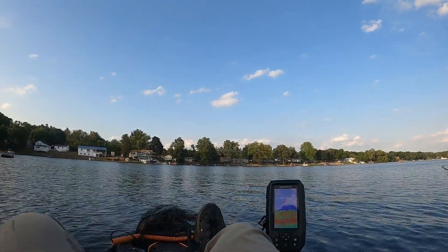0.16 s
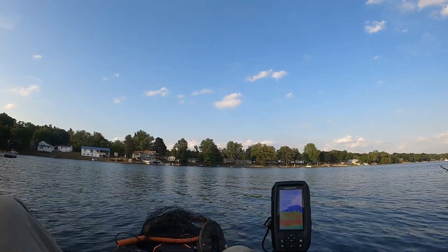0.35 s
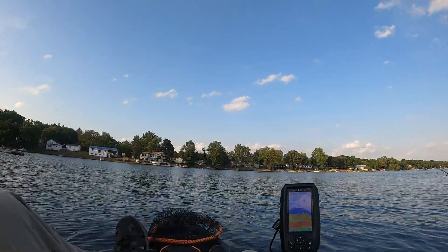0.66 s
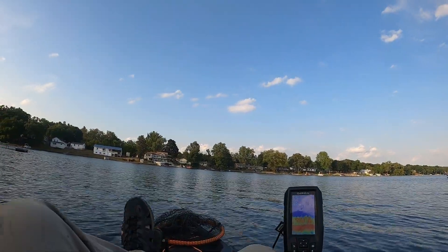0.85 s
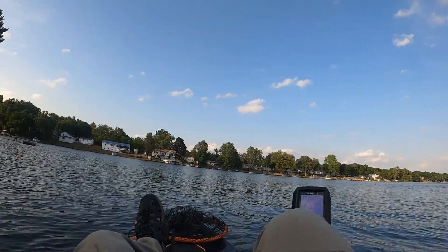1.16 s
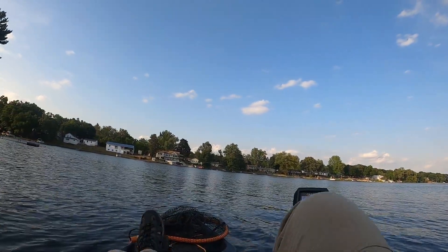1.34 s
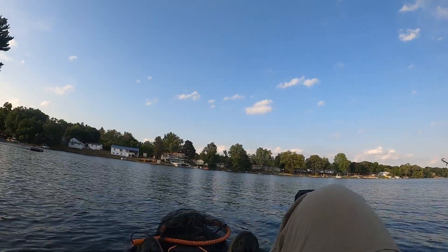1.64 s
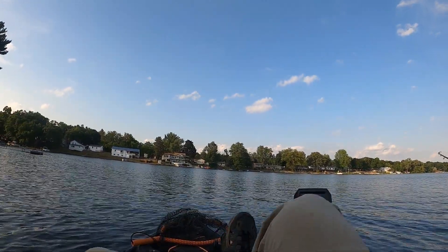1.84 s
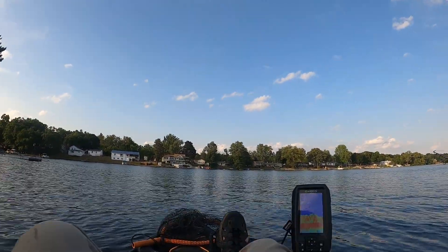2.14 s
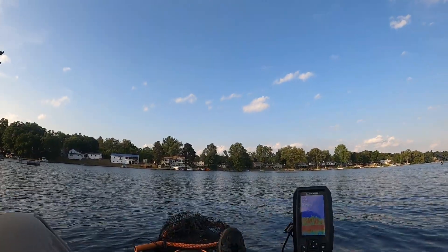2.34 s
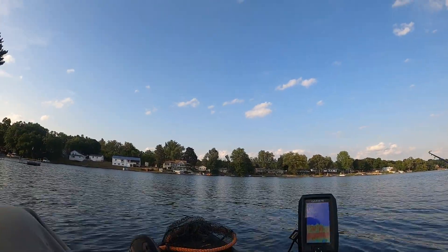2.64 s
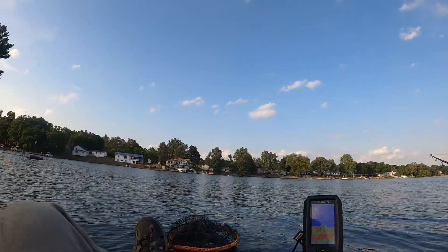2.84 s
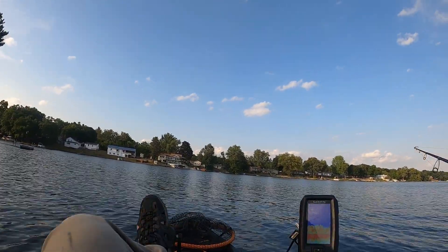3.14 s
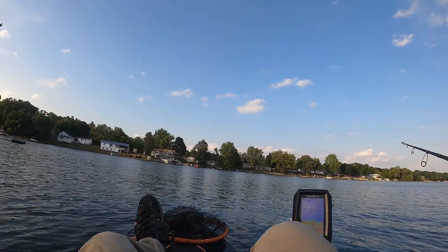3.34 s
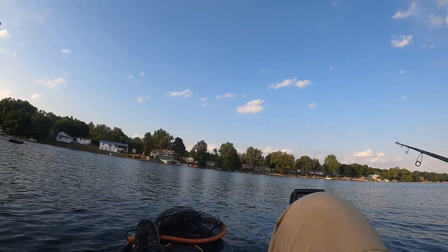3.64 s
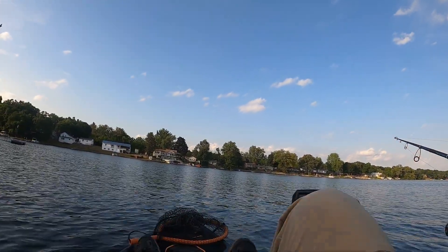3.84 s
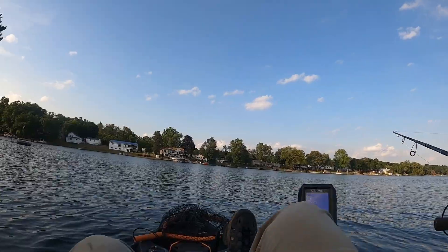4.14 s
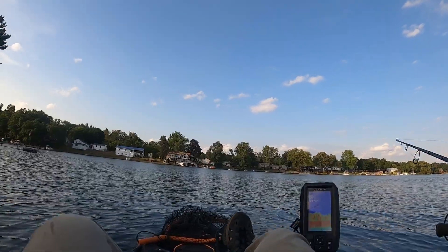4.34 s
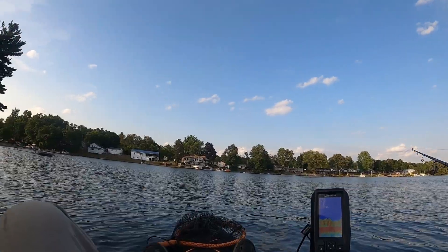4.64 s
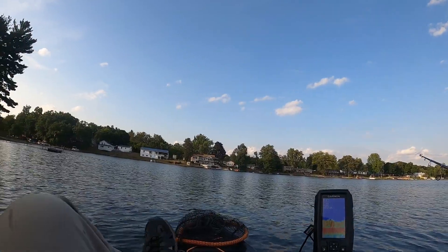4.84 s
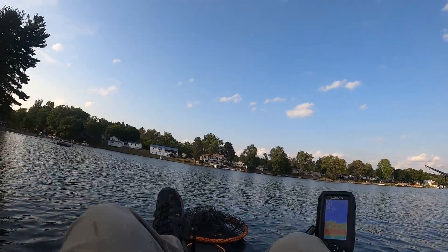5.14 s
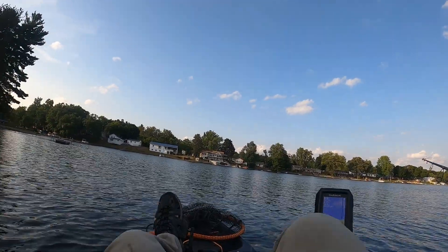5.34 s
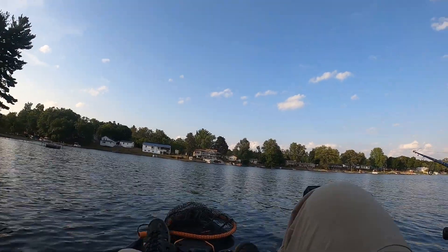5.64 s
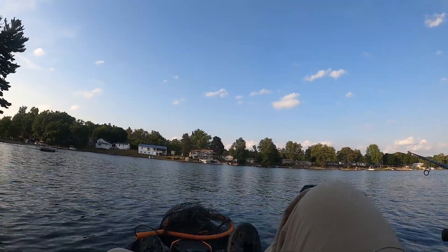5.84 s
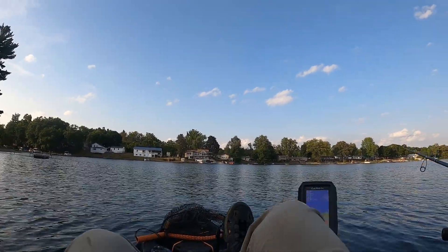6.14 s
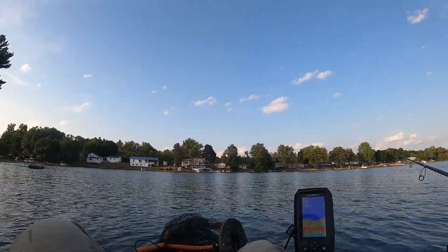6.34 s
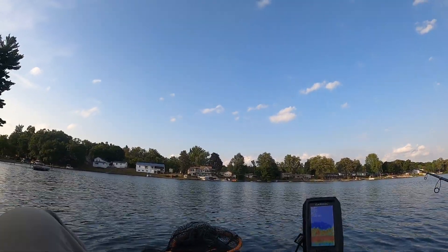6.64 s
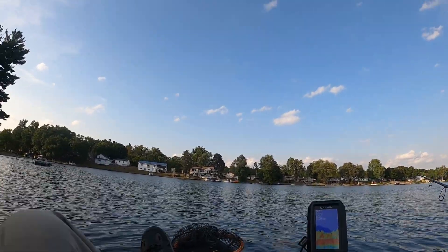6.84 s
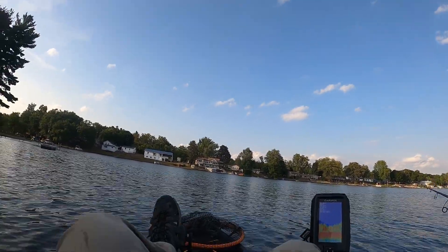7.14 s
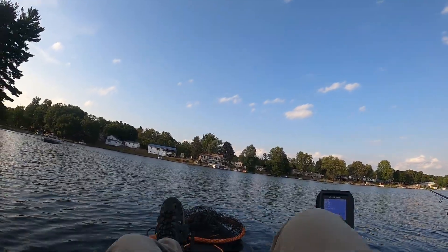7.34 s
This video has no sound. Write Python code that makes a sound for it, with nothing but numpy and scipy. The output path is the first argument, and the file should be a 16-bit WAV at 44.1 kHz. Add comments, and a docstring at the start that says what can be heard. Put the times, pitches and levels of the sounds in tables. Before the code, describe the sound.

Pedalling pushes a plastic kayak across a lake: broad watery wash rises and drops, then short laps and round plops follow. Light taps on the hull come singly at first, then a strong double knock with a boom, later a busy rattle with a splashy thump, and finally a soft bump and a sharper click. An unsteady low hum and rumble stay underneath. Heard very near, in stereo, without echo.

```python
"""Water washes along the plastic hull of a pedal kayak with each push of the legs on a calm lake.
Heard on board, close to the hull, through the two microphone ports of a small camera.
The water is patchy coloured noise; bubbles are gliding sines; knocks and thumps ring hull modes.
Splashes are noise puffs, and a low hum wavers over hull drumming, deep rumble and a faint hiss."""
import sys
import numpy as np
from scipy import signal
from scipy.fft import rfft, irfft
from scipy.io import wavfile
from scipy.ndimage import uniform_filter1d

SR = 44100
rng = np.random.default_rng(int(sys.argv[2]) if len(sys.argv) > 2 else 0)


def put_to_file(sound):
    """Save the sound as 16-bit audio at rate SR, in the file named by the first command-line argument."""
    columns = np.atleast_2d(sound).T  # one column per channel
    safe = np.clip(columns, -1, 1)
    whole_steps = np.round(safe * 32767)
    wavfile.write(sys.argv[1], SR, whole_steps.astype(np.int16))


N = 329896


def from_db(db):
    """Decibels to gain."""
    return 10 ** (np.asarray(db) / 20)


def rms_one(x):
    """Scale to unit rms."""
    return x / np.sqrt(np.mean(x ** 2) + 1e-20)


def in_time(rows):
    """Level from a table of t/s and level/dB, one value a sample."""
    s, level_db = np.transpose(rows)
    return np.interp(np.arange(N) / SR, s, level_db)


def at_hz(points, hz):
    """Columns of a table by frequency, read on a log axis."""
    f, *columns = np.transpose(points)
    return [np.interp(np.log(np.maximum(hz, 1)), np.log(f), c) for c in columns]


def drift(rate_hz):
    """Slow chance of spread 1: noise at every 40th sample through a double one-pole."""
    r = np.exp(-2 * np.pi * rate_hz * 40 / SR)
    noise = rng.standard_normal(N // 40 + 2002)
    slow = signal.lfilter([1], [1, -2 * r, r * r], noise)[2000:]   # the filter has settled
    return np.interp(np.arange(N) / 40, np.arange(len(slow)), rms_one(slow))


def ring(clicks, hz, t60):
    """A damped mode: a unit click sets a sine ringing, its t60 never under 2 ms."""
    r = from_db(-60 / (max(t60, .002) * SR))
    w = 2 * np.pi * hz / SR
    return signal.lfilter([0, np.sin(w)], [1, -2 * r * np.cos(w), r * r], clicks + 1e-18)


def water_noise(spectrum, patchy_db, rate_hz):
    """Two unrelated draws of coloured noise, each half-octave band flickering partly on its own; rms 1."""
    hz = np.fft.rfftfreq(N, 1 / SR)
    lowest, highest = spectrum[0][0] / 2, spectrum[-1][0] * 2   # an octave past the table
    coloured = rfft(rng.standard_normal((2, N))) * from_db(at_hz(spectrum, hz)[0])
    coloured = coloured * (hz > lowest) * (hz < highest)
    place = 2 * np.log2(hz + 1)   # in half octaves
    together = drift(rate_hz)
    out = 0
    for k in range(int(2 * np.log2(lowest)), int(2 * np.log2(highest)) + 2):
        weight = np.sqrt(np.clip(1 - np.abs(place - k), 0, 1))
        band = irfft(coloured * weight, N)
        out = out + band * from_db(patchy_db * (0.14 * together + drift(rate_hz)))
    return rms_one(out)


def add(track, s, sound):
    """Mix a sound into a track at a time."""
    i = round(s * SR)
    track[..., i:i + sound.shape[-1]] += sound[..., :N - i]


# swells, one for each push of the legs and a small one between:
# crest t/s, rise t/s, hold t/s, wash level/dB at the crest, lapping level/dB as the push ends
LEG_PUSHES = [(0.297, 0.62, 0.28, -55.5, -60.5), (1.19, 0.2, 0.31, -53, -67), (1.773, 0.14, 0.02, -59, -62),
              (2.19, 0.3, 0.4, -55.5, -69), (3.377, 0.45, 0.29, -52.5, -63.5),
              (4.393, 0.25, 0.33, -55, -62.5), (5.376, 0.5, 0.45, -53.5, -58.5),
              (6.529, 0.58, 0.071, -51.5, -59), (7.27, 0.3, 0.24, -53, -62)]
SLACK_DB, SAG_DB_PER_S, FALL_DB_PER_S = -66, 12, 62   # wash between pushes; decline held, extra once let go
LAP_SLACK_DB, LAP_RISE_DB_PER_S, LAP_FALL_DB_PER_S = -67.5, 14, 39


def pushes():
    """Wash dB rises to each crest, sags and drops; lapping dB peaks as each push ends."""
    crest, rise, hold, wash_db, lap_db = np.transpose(LEG_PUSHES)[..., None]
    after = np.arange(N) / SR - crest
    rising = wash_db + (wash_db - SLACK_DB) * after / rise
    falling = wash_db - SAG_DB_PER_S * after - FALL_DB_PER_S * np.maximum(after - hold, 0)
    wash = np.maximum(np.minimum(rising, falling).max(axis=0), SLACK_DB)
    released = after - hold
    lap = lap_db + np.minimum(LAP_RISE_DB_PER_S * released, -LAP_FALL_DB_PER_S * released)
    return uniform_filter1d(wash, size=SR // 10), np.maximum(lap.max(axis=0), LAP_SLACK_DB)


# colour of the water along the hull: f/Hz, relative level/dB per Hz
WASH_COLOUR = [(400, -0.5), (650, -4.5), (1100, -4), (1700, -5.5), (2600, -7), (4000, -12.5), (6300, -17),
               (7500, -25), (9000, -23.5), (10500, -32), (12500, -29), (14500, -50)]


def wash(wash_db):
    """Broad turbulence noise along the hull, swelling with the pushes."""
    return from_db(wash_db + 0.44 * drift(90.0)) * water_noise(WASH_COLOUR, patchy_db=1.48, rate_hz=22.0)


# colour of the lapping: f/Hz, relative level/dB per Hz
LAP_COLOUR = [(250, 0), (450, -6), (650, -4.5), (1050, 1.5), (1600, -14.5), (2500, -38), (4000, -59)]


def lapping(lap_db):
    """Darker water noise in short uneven spurts, strongest as a push ends."""
    spurts_db = 1.5 * drift(56)
    return from_db(lap_db + spurts_db) * water_noise(LAP_COLOUR, patchy_db=3.5, rate_hz=20)


def bubble(hz, length, rise):
    """A pocket of air rings near the surface, its pitch gliding by the signed rise, its swell uneven."""
    length = max(length, .003)
    t = np.arange(int(2 * length * SR)) / SR / length   # in lengths
    wobble_oct = .05 * np.interp(t, np.linspace(0, 2, 9), rng.standard_normal(9))
    glide_oct = rise * (np.minimum(t, 1.3) ** 0.98 - .4)
    pitch = hz * 2 ** (glide_oct + wobble_oct)
    uneven = 1 + 0.5 * np.interp(t, np.linspace(0, 2, 12), rng.standard_normal(12))
    swell = np.minimum(t / 0.11, 1) * np.exp(-t ** 3 * 0.52) * uneven
    return swell * np.sin(2 * np.pi * np.cumsum(pitch) / SR)


# single bubbles close by, and at 7.283 s a short 2.23 kHz ring after the knock just before it: t/s, level/dB
# before the uneven swell, nominal f/Hz, length/s (3 ms at least), glide/octaves per length
PLOPS = [(0.251, -47.5, 1610, 0.012, 0.0011), (0.43, -49, 1230, 0.0034, 0.22),
         (0.484, -52, 1350, 0.011, -.05), (0.507, -45.5, 810, 0.007, -0.14),
         (0.548, -63, 2800, 0.0046, -0.045), (0.602, -57, 1920, 0.013, -0.053),
         (0.636, -49, 1190, 0.0044, 0.18), (0.647, -44, 777, 0.023, 0.028), (0.702, -45, 1230, 0.015, 0.25),
         (0.856, -53, 1650, .005, 0.1), (0.897, -64, 2130, .005, 0.13), (1.268, -43.5, 535, .012, -0.066),
         (1.31, -51, 1840, 0.0067, .02), (1.701, -40, 1080, 0.0061, 0.1),
         (1.733, -41.5, 970, 0.0035, 0.048), (1.794, -50, 1920, 0.004, 0.05),
         (1.799, -51, 1950, 0.0046, 0.3), (1.822, -54, 2000, .004, 0.091), (2.043, -40, 1164, 0.012, 0.35),
         (2.159, -49, 1280, 0.0087, 0.031), (2.671, -49, 1150, 0.019, 0.086),
         (2.966, -54, 806, 0.022, 0.065), (3.127, -39, 1075, 0.004, 0.093),
         (3.382, -41, 2970, 0.0027, -0.064), (3.557, -34.5, 1040, 0.012, 0.13),
         (4.193, -45.5, 824, 0.02, -0.05), (4.214, -48, 980, 0.015, 0.14), (4.324, -42.5, 876, 0.035, 0.61),
         (4.654, -42, 1020, 0.0031, 0.0068), (4.658, -43.5, 1067, 0.02, 0.012),
         (4.69, -42.5, 970, 0.0059, -0.35), (4.694, -45.5, 2600, 0.0037, 0.0067),
         (4.748, -47, 2050, 0.0061, -0.3), (4.768, -47, 1050, 0.0058, 0.0042),
         (4.975, -46, 926, 0.019, 0.65), (5.131, -53, 2370, .008, 0.18), (5.223, -42.5, 1076, 0.011, -0.13),
         (5.3343, -34.5, 2420, 0.0025, -0.41), (5.81, -55, 1550, .008, .05),
         (5.848, -49, 1290, 0.0091, 0.062), (5.895, -45, 1040, 0.011, 0.31),
         (5.945, -51.5, 2140, .005, 0.1), (6.205, -45, 1800, 0.0078, -0.1),
         (6.211, -47, 1204, 0.017, -0.042), (6.247, -50, 1850, 0.0058, -0.4),
         (6.256, -49, 1880, 0.0073, -0.05), (6.304, -45, 1050, 0.008, -0.21),
         (6.589, -50, 1020, 0.013, 0.15), (6.781, -50, 1090, 0.0064, 0.087), (6.96, -57, 3020, 0.0056, 0.1),
         (7.109, -41.5, 974, 0.013, 0.17), (7.131, -47, 1130, .016, -0.069),
         (7.193, -39.5, 1100, 0.0071, -0.15), (7.283, -45, 2230, 0.009, -0.044),
         (7.343, -51, 3440, 0.0037, -0.27)]


def bubbles():
    """The clear plops at the waterline, and one short ring after a knock, each a gliding sine."""
    out = np.zeros(N)
    for s, db, hz, length, rise in PLOPS:
        add(out, s, from_db(db) * bubble(hz, length, rise))
    return out


def gurgle(per_s):
    """Many small bubbles at random, mostly near one kilohertz; rms 1."""
    out = np.zeros(N)
    for when, size, tone, cycles in rng.random((int(per_s * N / SR), 4)):
        hz = 1050 * 2 ** (6.0 * (tone - .42) ** 3 + .6 * (tone - .42))
        off_pitch_db = -5 * abs(np.log2(hz / 1050))   # fainter either side of the centre
        level_db = -2.5 * np.log(size + 0.0091) + off_pitch_db
        length = (2 + 6 * cycles ** 3) / hz
        add(out, when * N / SR, from_db(level_db) * bubble(hz, length, 0.18))
    return rms_one(out)


# soft splashes against the side: t/s, rms level/dB before the envelope, centre f/Hz, length/s
SIDE_SPLASHES = [(3.133, -52, 2400, 0.079), (3.234, -53, 2100, 0.076), (3.397, -49.5, 900, 0.025),
                 (3.92, -34.5, 503, 0.032), (4.651, -56, 1520, 0.063), (4.888, -56.5, 1380, 0.13),
                 (5.738, -29, 560, 0.02), (6.266, -56.5, 1150, 0.11)]


def splashes():
    """Puffs of noise in a broad band, quick to rise and slower to fade."""
    out = np.zeros((2, N))
    for s, db, hz, length in SIDE_SPLASHES:
        t = np.arange(int(.2 * SR)) / SR / length   # in lengths
        band = signal.butter(2, [hz / 2.15, hz * 1.13], "band", fs=SR, output="sos")
        puff = rms_one(signal.sosfilt(band, rng.standard_normal((2, len(t)))))
        add(out, s, from_db(db) * puff * np.minimum(t / 0.11, 1) * np.exp(-t ** 2))
    return out


def faint_ticks(lap_db, count):
    """Rows like the knocks, at random moments and of random colour, louder while the water laps."""
    draw = rng.random((count, 4))
    at = (draw[:, :1] * (N - 400)).astype(int)
    over_lap_db = np.array([6, 3, 2])   # low, middle, high modes
    spread_db = 5 * (draw[:, 1:] - .5) * 2
    return np.hstack([at / SR, lap_db[at] + over_lap_db + spread_db])


# gear knocks and ticks on the hull: t/s, drive level/dB of the low, middle and high small-panel modes
HULL_KNOCKS = [(0.563, -44.5, -65, -66), (0.647, -59, -66, -70), (1.236, -71, -58, -51),
               (1.262, -51, -49, -56), (1.286, -64, -46, -44), (1.355, -42, -45.5, -46),
               (1.417, -65, -50, -52), (1.774, -41.5, -64, -68), (2.316, -44.5, -50, -54),
               (2.421, -44, -51, -63), (3.2973, -33.5, -25, -46), (3.3004, -26, -24.5, -38),
               (3.525, -45, -44, -44), (3.536, -36, -49.5, -39), (3.921, -47, -45, -44),
               (3.93, -40.5, -45, -48), (4.604, -44.5, -51, -66), (4.672, -43, -43.5, -39),
               (4.701, -53, -55, -52), (4.728, -42, -47, -43), (4.88, -49, -57, -71),
               (5.211, -60, -54, -51), (5.3375, -36, -44, -58), (5.416, -44, -65, -71),
               (5.565, -49, -53, -66), (5.614, -41, -50, -49), (5.666, -51, -66, -58),
               (5.696, -44, -48, -42), (5.715, -41, -65, -64), (5.734, -32, -41, -60),
               (5.744, -30.5, -37, -51), (5.769, -39, -43, -63), (5.835, -40.5, -56, -64),
               (5.866, -47, -54, -46.5), (5.888, -44, -53, -51), (5.918, -65, -62, -51.5),
               (5.973, -42.5, -66, -66), (6.32, -43, -70, -64), (6.343, -45.5, -63, -64),
               (7.278, -40.5, -32.5, -40), (7.32, -66, -46.5, -28)]
# small panels that crack: f/Hz, relative level/dB, t60/s (2 ms at least)
SMALL_PANELS = [(481, 5.5, 0.011), (545, -3.5, 0.064), (778, -2, 0.027), (982, 0.5, 0.022),
                (1078, -4, 0.041), (1394, 0.5, 0.02), (2050, 6, 0.011), (2350, -1, 0.016),
                (2800, -5, 0.007), (3430, 0, 0.0042), (4250, -2.5, 0.0015), (5420, -9, 0.002),
                (6700, -23, 0.002), (9700, -28, 0.0018)]


def knocks(lap_db):
    """Each contact rattles for a few milliseconds and rings the small panels' modes."""
    s, low_db, mid_db, high_db = np.vstack([HULL_KNOCKS, faint_ticks(lap_db, count=110)]).T
    at = np.round(s * SR).astype(int)
    t = np.arange(400) / SR
    out = np.zeros(N)
    for hz, db, t60 in SMALL_PANELS:
        level_db = low_db if hz < 1600 else mid_db if hz < 3000 else high_db
        # high modes catch only the first sharp touch
        touch = np.minimum(t / .0004, 1) * np.exp(-t / 0.002 * np.sqrt(hz / 1000))
        rattle = rng.standard_normal((len(s), 400)) * touch
        # scale by how much of the rattle lies on this mode
        at_pitch = np.abs(rattle @ np.exp(-2j * np.pi * hz * t))
        strength = np.maximum(at_pitch, 0.3 * np.linalg.norm(rattle, axis=1))
        rattle = rattle / strength[:, None]
        clicks = np.zeros(N)
        np.add.at(clicks, at[:, None] + np.arange(400), from_db(level_db + db)[:, None] * rattle)
        rounding = signal.butter(2, hz * 1.21, fs=SR, output="sos")   # a rounded contact
        out += ring(signal.sosfilt(rounding, clicks + 1e-18), hz, t60)
    return out


# heavier blows on the hull: t/s, drive level/dB before softening, strongest f/Hz
HEAVY_BLOWS = [(3.126, -34, 134), (3.303, -26, 380), (3.31, -21.5, 94), (3.383, -29.5, 89),
               (3.539, -29, 160), (3.557, -29, 160), (3.92, -28, 95), (3.929, -27.5, 255),
               (4.77, -36.5, 250), (5.336, -31.5, 312), (5.737, -22.5, 146), (6.219, -33.5, 182),
               (6.259, -40, 228), (6.285, -34, 180), (7.284, -30.5, 78.6)]
# deep panels that boom: f/Hz, relative level/dB, t60/s
DEEP_PANELS = [(88.4, -2, 0.1), (142.6, -3, 0.24), (187.8, -6.5, 0.24), (253.5, -2, 0.14), (315, -18, 0.03),
               (379, 2.5, 0.042)]


def thumps():
    """A soft push rings the deep panels' modes, favouring those nearest the blow's pitch."""
    s, level_db, near_hz = np.transpose(HEAVY_BLOWS)
    out = np.zeros(N)
    for hz, db, t60 in DEEP_PANELS:
        clicks = np.zeros(N)
        late = rng.uniform(0, 0.00402, len(s))
        off_db = -10 * np.abs(np.log2(hz / near_hz))
        sign = rng.choice([-1, 1], len(s))
        clicks[((s + late) * SR).astype(int)] = from_db(level_db + db + off_db) * sign
        out += ring(clicks, hz, t60)
    return signal.lfilter([.1], [1, -.9], out)   # softened by a one-pole low-pass


# bump near the camera: t/s, level/dB before the envelope, f/Hz, t60/s, left minus right level/dB
MOUNT_BUMP = [(7.187, -22, 67.4, 0.012, 21.5)]


def thud():
    """A soft bump carried through the mount: a few slow swings, mostly in the left port."""
    out = np.zeros((2, N))
    for s, db, hz, t60, pan_db in MOUNT_BUMP:
        t = np.arange(int(.2 * SR)) / SR
        fade = from_db(-60 * np.maximum(t - .018, 0) / t60)
        swing = np.minimum(t / 0.022, 1) * fade * np.sin(2 * np.pi * hz * t)
        add(out, s, from_db(db + np.array([[.5], [-.5]]) * pan_db) * swing)
    return out


# colour of the hull drumming: f/Hz, relative level/dB per Hz
DRUM_COLOUR = [(90, -12.5), (160, 4.5), (250, -1.5), (400, -10.5), (600, -16.5), (900, -30.5)]
# its course: t/s, level/dB
DRUM_LEVEL = [(0.0, -46.5), (1.1, -48.5), (1.39, -47.5), (2.5, -51.5), (3.3, -46.5), (4.38, -50.5),
              (4.72, -44), (5.61, -46), (6.06, -50.5), (6.57, -46), (6.9, -50), (7.48, -48.5)]


def drumming():
    """The hull drums: patchy low noise that follows its own level curve."""
    return from_db(in_time(DRUM_LEVEL)) * water_noise(DRUM_COLOUR, patchy_db=4.0, rate_hz=13.6)


# course of the hum: t/s, level/dB before its trembling
HUM_LEVEL = [(0.0, -44.5), (1.11, -48.5), (1.4, -50.5), (1.8, -40), (2.71, -46.5), (2.86, -51.5),
             (3.85, -58.5), (4.51, -47.5), (4.82, -79), (4.94, -51), (5.29, -62), (5.48, -47), (5.89, -50),
             (6.13, -46), (6.24, -59.5), (6.8, -44), (6.99, -48), (7.4, -44), (7.48, -48)]
HUM_HZ = 130.8


def hum():
    """A low tone with its octave, both trembling a little in phase and level."""
    turn = 2 * np.pi * HUM_HZ * np.arange(N) / SR + 0.35 * drift(3.0)
    octave = from_db(-16 + 3.5 * drift(5.1)) * np.sin(2 * turn + 1.0 * drift(11.7))
    level_db = in_time(HUM_LEVEL) + 1.8 * drift(30) + 2.25 * drift(3.9)
    return np.sqrt(2) * from_db(level_db) * (np.sin(turn) + octave)


# colour of the deep rumble: f/Hz, relative level/dB per Hz
RUMBLE_COLOUR = [(30, -3), (44, -24), (55, 6), (66, -12), (90, -1.5), (120, -12.5), (170, -39)]
RUMBLE_DB, RUMBLE_FOLLOWS = -50.5, 0.32   # between pushes; share of the wash's swing in dB


def rumble(wash_db):
    """Deep patchy noise that swells partly with the wash."""
    level_db = RUMBLE_DB + RUMBLE_FOLLOWS * (wash_db - SLACK_DB)
    return from_db(level_db) * water_noise(RUMBLE_COLOUR, patchy_db=3.0, rate_hz=23)


# colour of the faint background: f/Hz, relative level/dB per Hz
CALM_COLOUR = [(800, -15), (1600, -10.5), (2500, -54), (4000, -60), (6300, -10), (9000, -8.5), (12500, -28),
               (14500, -62)]
CALM_DB = -81.5


def calm():
    """Very faint noise in a middle and a high band, its overall level constant, its bands flickering."""
    return from_db(CALM_DB) * water_noise(CALM_COLOUR, patchy_db=1.5, rate_hz=4)


# the two microphone ports: f/Hz, likeness 0-1, left minus right level/dB, left lag/rad
MIC_PORTS = [(60, .82, 4.6, 0), (130, .88, 2.6, .35), (300, .92, 1.5, .48), (550, .92, 0, .5),
             (1000, .86, 1.2, .7), (2000, .82, 3.6, .75), (3200, .72, 3.4, .8), (5000, .6, 1.6, .35),
             (7000, .86, 1.3, .05), (9000, .93, .7, 0), (13000, .84, -1, 0)]


def ports(pair):
    """Wide sources: left hears the first draw; right hears it shifted earlier, mixed with the second."""
    alike, balance_db, lag = at_hz(MIC_PORTS, np.fft.rfftfreq(N, 1 / SR))
    alike = np.clip(alike, 0, 1)
    one, other = rfft(pair)
    right = alike * one * np.exp(1j * lag) + np.sqrt(1 - alike ** 2) * other
    return irfft(np.array([one * from_db(balance_db / 2), right * from_db(-balance_db / 2)]), N)


def point(mono):
    """A single small source reaches both ports whole, the right a little earlier."""
    _, balance_db, lag = at_hz(MIC_PORTS, np.fft.rfftfreq(N, 1 / SR))
    left, right = from_db(balance_db / 2), from_db(-balance_db / 2) * np.exp(1j * lag)
    return irfft(rfft(mono) * np.array([left, right]), N)


def scene():
    """All sources at the two ports."""
    wash_db, lap_db = pushes()
    wide = wash(wash_db) + lapping(lap_db) + splashes()
    wide += drumming() + rumble(wash_db) + calm()
    small = from_db(lap_db + 2.5) * gurgle(per_s=150) + bubbles()   # gurgle follows the lapping
    small += knocks(lap_db) + thumps() + hum()
    return ports(wide) + point(small) + thud()


def record(dry):
    """The microphone loses the deepest bass; the top is cut steeply, 40 dB down from 15.1 kHz."""
    firm = signal.sosfilt(signal.butter(2, 42, "high", fs=SR, output="sos"), dry)
    return signal.sosfilt(signal.cheby2(12, 40, 15100, fs=SR, output="sos"), firm)


dry = scene()
out = record(dry)
put_to_file(out)
```